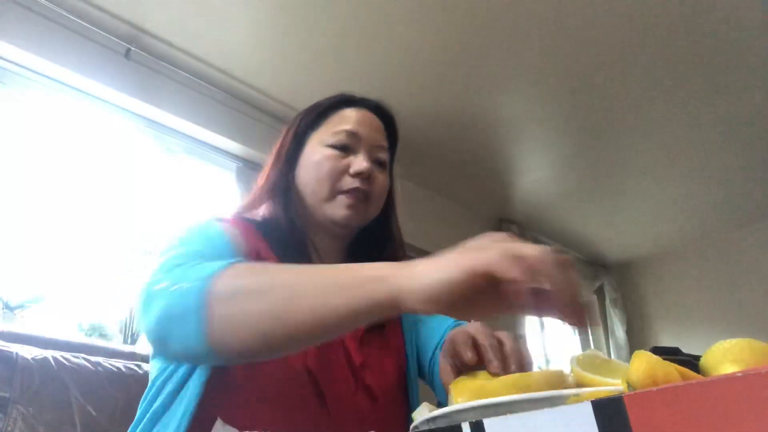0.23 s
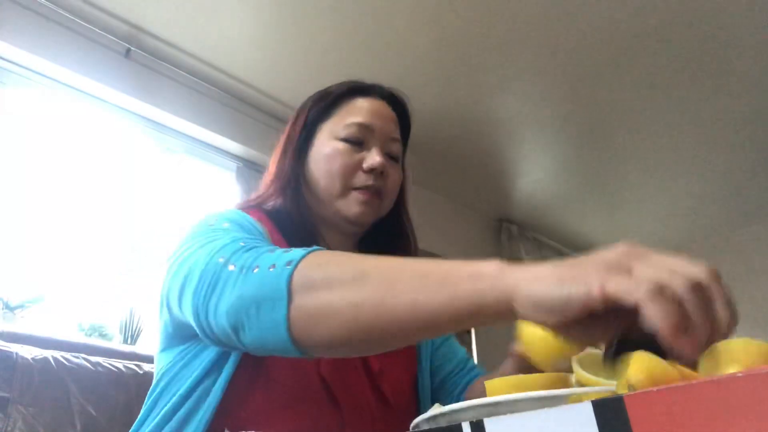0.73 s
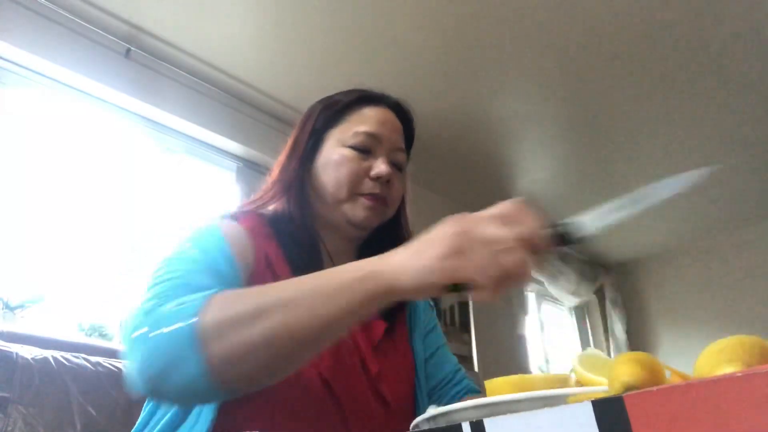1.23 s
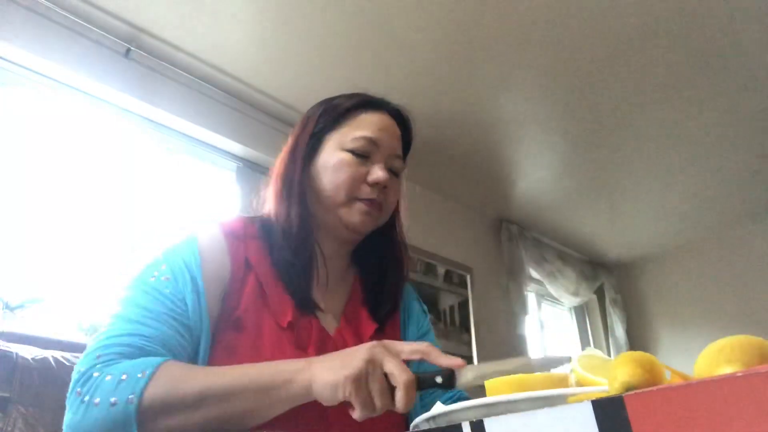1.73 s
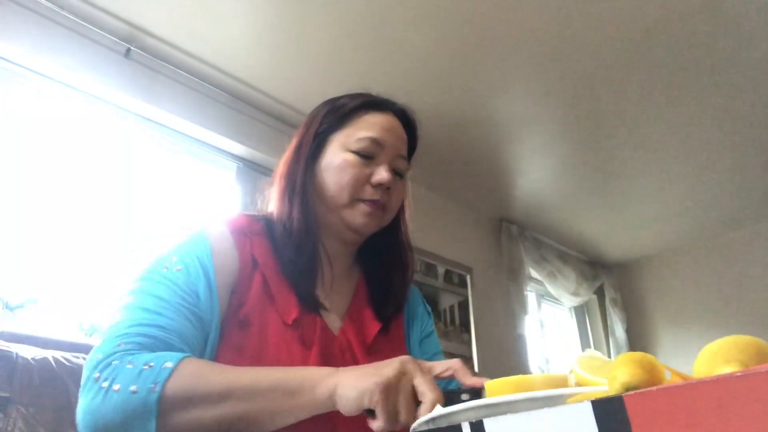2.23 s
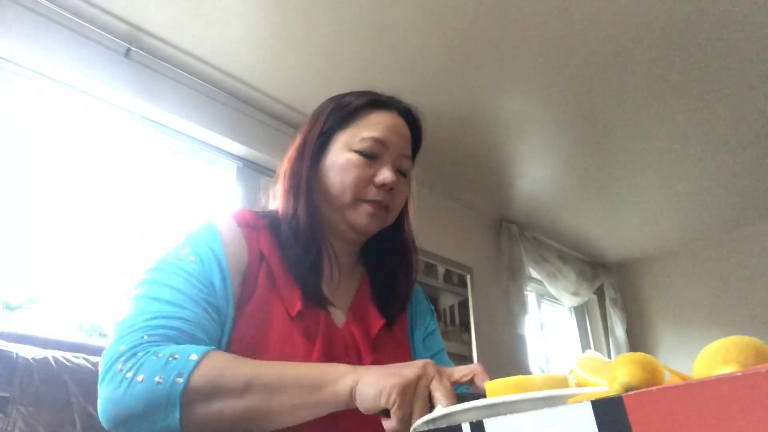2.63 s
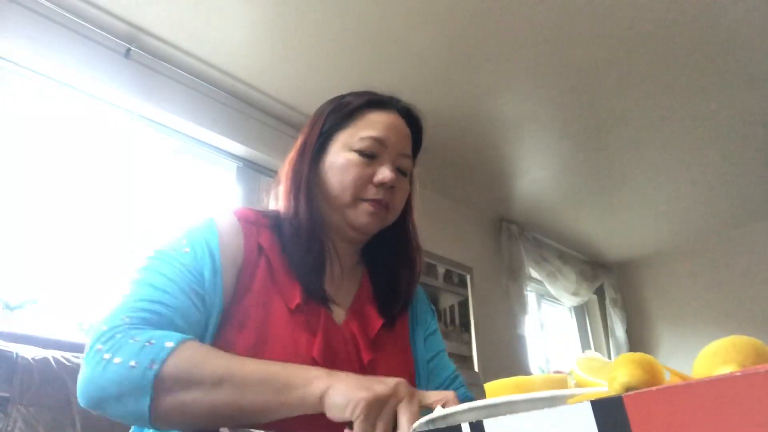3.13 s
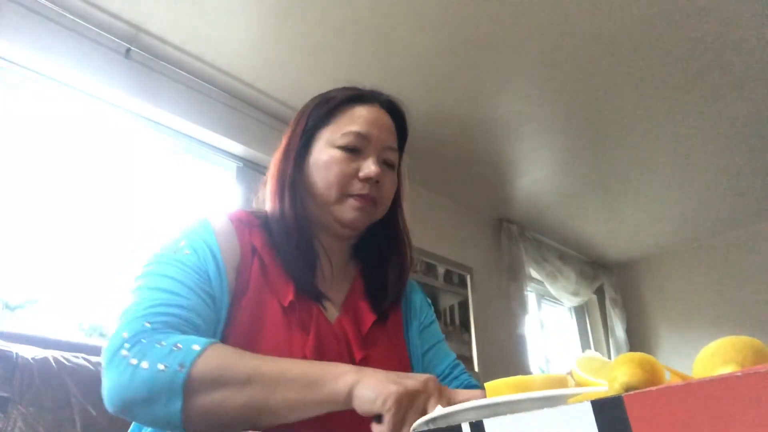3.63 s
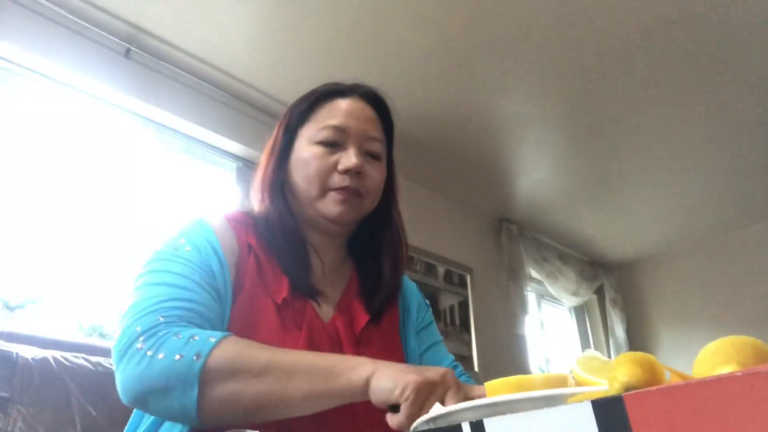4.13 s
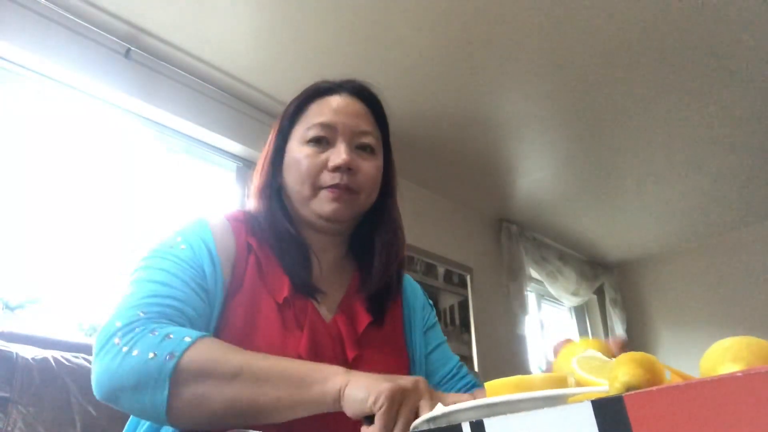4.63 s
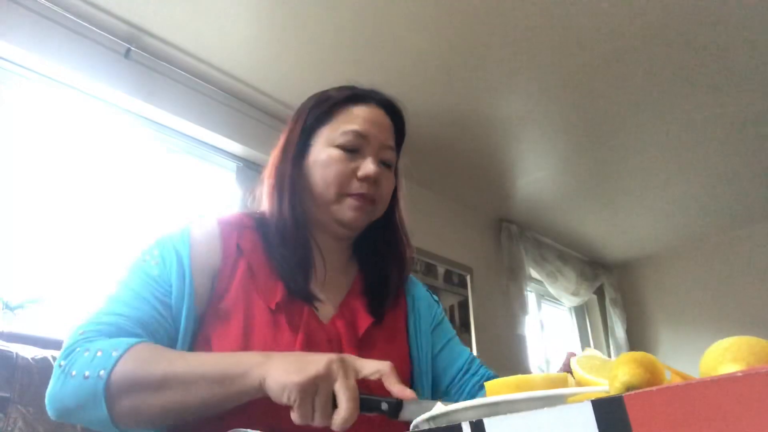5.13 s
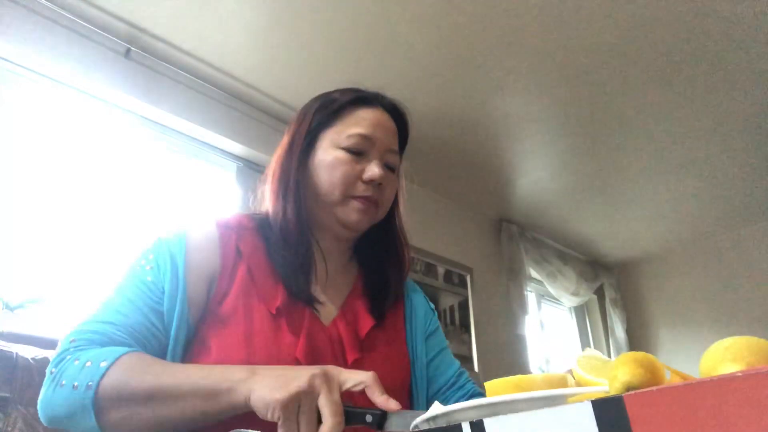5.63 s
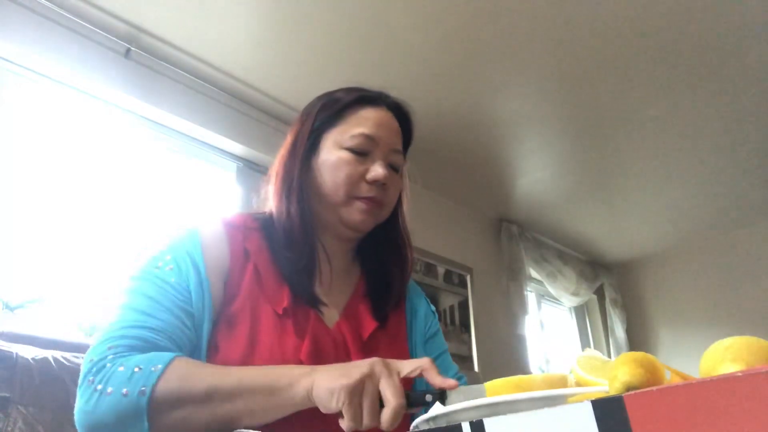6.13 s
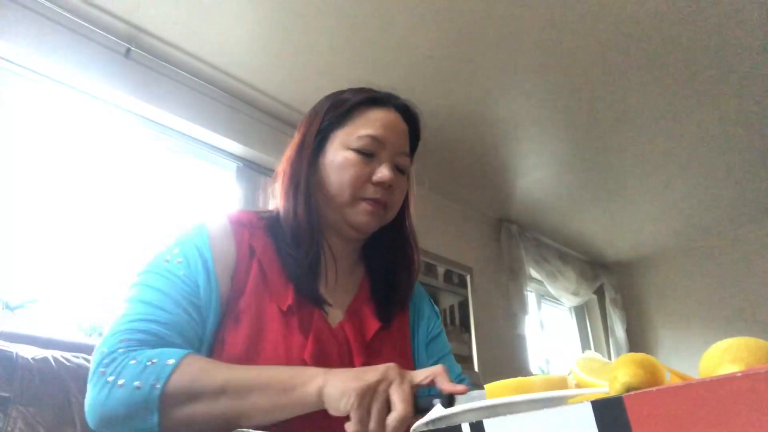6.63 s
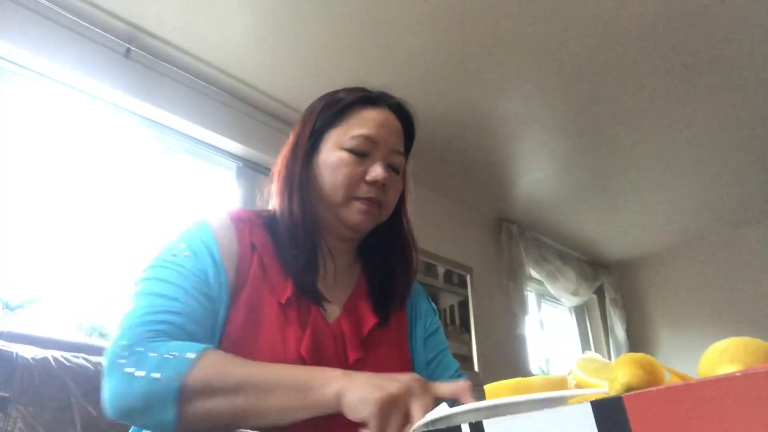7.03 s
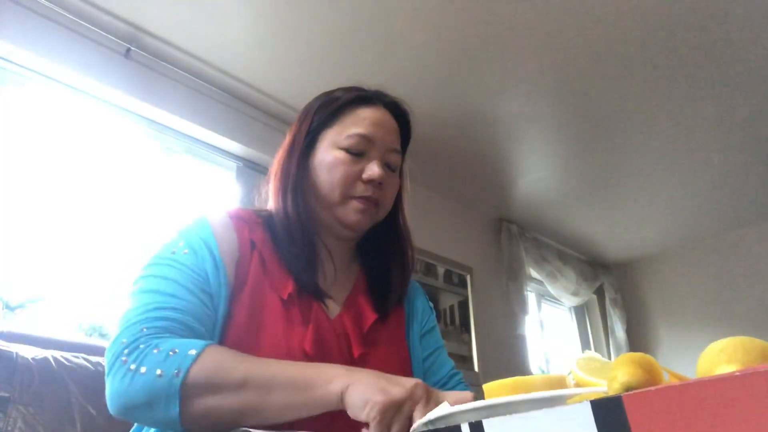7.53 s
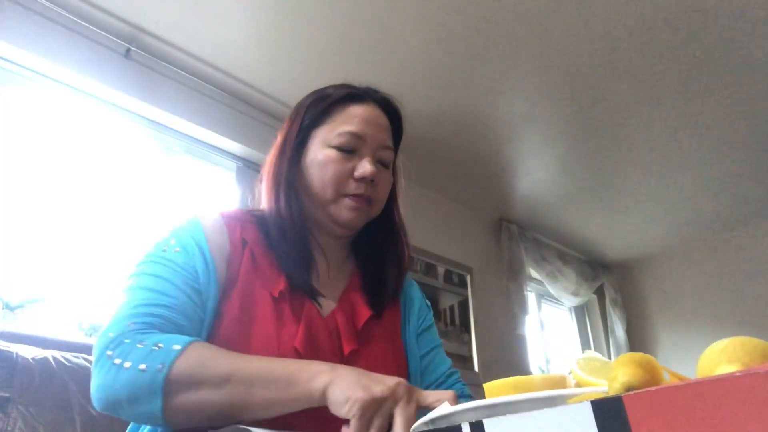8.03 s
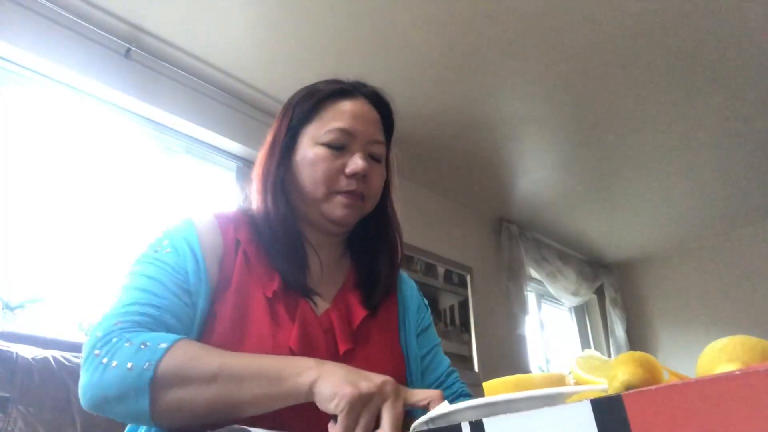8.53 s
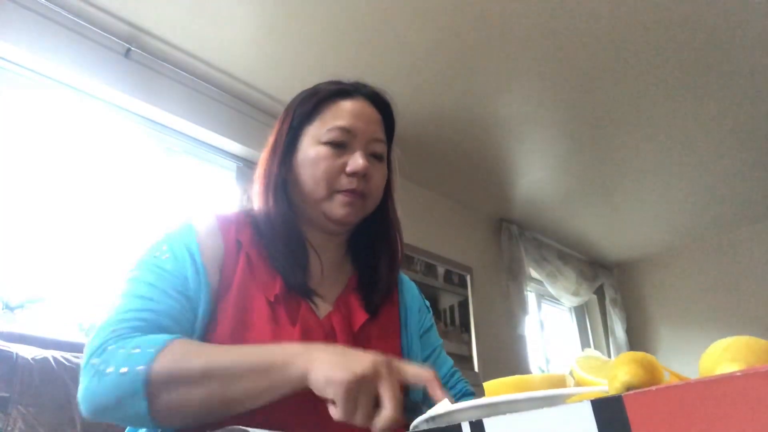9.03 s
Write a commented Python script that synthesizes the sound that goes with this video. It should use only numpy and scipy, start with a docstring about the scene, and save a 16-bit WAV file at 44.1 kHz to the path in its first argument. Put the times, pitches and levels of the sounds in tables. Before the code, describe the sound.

In a quiet living room, soft woody knocks and ticks, wet faint knife strokes, and sharp steel-on-china clinks thumping through the table.

```python
"""Lemons are sliced on a china plate at a table in a living room, the microphone standing on the same table.
Over quiet air (coloured noise), arms shift on the table (low noise, bumps) and the first strokes scrape faintly.
From 0.4 s a knife is picked up with dull knocks and ticks (pulses, noise bursts, modes), then saws (grains of noise).
From 4 s the blade clinks on the plate (ringing modes and a ping), thumping through the table top, loudest near 8.7 s.
A ceiling echo and a tail of decaying noise let the room ring on for up to half a second after a blow."""
import sys
import numpy as np
from scipy import signal
from scipy.fft import rfft, irfft
from scipy.io import wavfile
from scipy.ndimage import uniform_filter1d

SR = 44100
rng = np.random.default_rng(int(sys.argv[2]) if len(sys.argv) > 2 else 0)


def inscribe(sig):
    """Save sig as 16-bit PCM at rate SR to the path in sys.argv[1].

    A 1-D sig is mono; a 2-D sig holds one channel per row.
    Samples are clipped to [-1, 1] before scaling.
    """
    pcm = np.round(np.clip(np.atleast_2d(sig).T, -1, 1) * 32767)
    wavfile.write(sys.argv[1], SR, pcm.astype(np.int16))


N = 408807   # length of the scene, samples
HIT = np.arange(SR // 2) / SR   # time since a blow, s

# blade meets plate: (time [s], ring at 0.9-2.6 kHz [dB], ring at 2.6-5.5 kHz [dB], treble [dB],
# table thump [dB], share of the blade [0-1], first ping [Hz])
CLINKS = [(4.037, -54.5, -46, -52.5, -51, 0.92, 3180), (4.386, -56, -53, -54.5, -56, 0.4, 3160),
          (4.453, -46, -38.5, -43, -50.5, 0.8, 3180), (7.166, -34, -40, -40.5, -32.5, 0, 3470),
          (7.7322, -40.5, -49, -45.5, -46.5, 1, 3170), (8.09, -45.5, -47, -63, -40, 0.03, 3420),
          (8.19, -41.5, -43.5, -47, -45.5, 0, 3400), (8.5036, -42.5, -44.5, -48, -47, 0.01, 3360),
          (8.613, -34, -33.5, -41, -35.5, 0, 3520), (8.7454, -25, -26, -25.5, -28, 0.62, 3160)]
# dull knocks of fruit, knife handle and hands on the table: (time [s], rap [dB], boom [dB], rap centre [Hz])
KNOCKS = [(0.405, -35, -43.5, 600), (.522, -23.5, -29, 300), (0.555, -33, -30, 400), (.578, -37, -54, 377),
          (.638, -22, -26.5, 330), (.694, -25.5, -55, 400), (.725, -32, -39, 840), (0.736, -43, -54, 980),
          (0.758, -44, -63, 524), (0.821, -34, -62, 500), (0.901, -39.5, -67, 385),
          (1.035, -39.5, -40, 480), (1.212, -53.5, -50, 388), (1.264, -52.5, -57, 615),
          (1.415, -48.5, -47.5, 554), (1.524, -69, -53, 417), (1.845, -54, -47, 400),
          (1.951, -51, -60, 507), (2.145, -45.5, -47.5, 400), (2.395, -40, -57, 600),
          (2.584, -48.5, -65, 460), (2.799, -53, -44, 400), (2.875, -53, -42, 348),
          (3.826, -52.5, -72, 555), (4.016, -47, -59, 430), (4.041, -65, -45.5, 350),
          (4.554, -47, -56, 507), (4.924, -47, -47, 570), (5.112, -64, -54.5, 450), (5.238, -68, -66, 600),
          (5.82, -62, -64, 500), (6.133, -52.5, -67, 500), (6.479, -52, -54, 400), (6.549, -57, -68, 460),
          (7.167, -30, -36.5, 770), (7.766, -35, -58, 464), (7.817, -46, -64, 1020),
          (8.153, -46.5, -54, 1180), (8.48, -51, -56, 900), (9.136, -62, -51, 530),
          (9.225, -57, -49.5, 506)]


def from_db(db):
    """Decibels to gain."""
    return 10 ** (np.asarray(db) / 20)


def rms_one(x):
    """Scale to rms 1."""
    return x / np.sqrt(np.mean(x ** 2) + 1e-20)


def peak_one(x):
    """Scale so that the loudest five milliseconds have rms 1."""
    return x / np.sqrt(uniform_filter1d(x ** 2, size=220, mode="constant").max() + 1e-20)


def loudness_one(x):
    """Scale a blow so that its energy equals 15 ms at rms 1."""
    return x / np.sqrt(np.sum(x ** 2) / (.015 * SR) + 1e-20)


def at_hz(points, hz):
    """Read a table on a log-frequency axis."""
    table_hz, values = np.array(points).T
    return np.interp(np.log(hz + 1e-3), np.log(table_hz), values)


def cut(x, hz, kind, order=2):
    """Low-, high- or band-pass filter."""
    sos = signal.butter(order, np.clip(hz, 10, .45 * SR), kind, fs=SR, output="sos")
    return signal.sosfilt(sos, x + 1e-18)


def colour(x, spectrum):
    """Give a steady sound a spectrum; rms 1."""
    size = 2 ** 19
    gain = from_db(at_hz(spectrum, np.fft.rfftfreq(size, 1 / SR)))
    return rms_one(irfft(rfft(x, size) * gain)[:N])


def drift(rate_hz):
    """Slow chance with spread 1."""
    return rms_one(cut(rng.standard_normal(N + SR), rate_hz, "low")[SR:])


def add(out, s, sound):
    """Mix a sound in at a given time."""
    at = max(round(s * SR), 0)
    out[at:at + len(sound)] += sound[:N - at]


def swell(start, length, attack_s, release_s):
    """Pressure rises, holds until the length is over, then fades."""
    t = np.arange(N) / SR - start
    rise = np.clip(t / attack_s, 0, 1)
    fade = np.clip(1 - (t - length) / release_s, 0, 1) ** 2
    return rise * fade


def grains(per_s, spread_db):
    """Random small slips of uneven size."""
    out = np.zeros(N)
    at = np.flatnonzero(rng.random(N) < per_s / SR)
    size = np.minimum(rng.exponential(1, N)[at], 4)
    out[at] = from_db(spread_db * size) * np.sign(rng.random(N)[at] - .5)
    return out


def burst(t60):
    """The crunch of a contact: noise that dies at once."""
    return rng.standard_normal(len(HIT)) * from_db(-60 * HIT / t60)


def ring(modes, spread_db):
    """One blow: every mode dies away from a strength of its own."""
    out = np.zeros(len(HIT))
    for hz, db, t60 in modes:
        t = HIT[:int(1.2 * t60 * SR)]
        strength = from_db(db + spread_db * rng.standard_normal()) * np.sign(rng.random() - .5)
        decay = np.exp(-np.log(1000) * t / t60)
        out[:len(t)] += strength * decay * np.sin(2 * np.pi * hz * t)
    return out


def bend(x, corner_hz, order):
    """Bending waves carry the treble first, so a blow arrives as a short falling chirp: a chain of allpasses."""
    k = np.tan(np.pi * corner_hz / SR)
    pole = (k - 1) / (k + 1)
    return signal.sosfilt(np.tile([pole, 1, 0, 1, pole, 0], (order, 1)), x + 1e-18)


def thump(centre_hz, modes_db, crunch_db):
    """A push on the table: a broad pulse, a little crunch, then the ring of the top; unit peak level."""
    # modes of the table top: (frequency [Hz], relative level [dB], t60 [s])
    table_modes = [(171, -9, 0.15), (206.7, 4, 0.06), (300, -8, 0.45), (334, -4.5, 0.073), (400, 6, 0.049),
                   (480, 1.5, 0.022), (600, -6.5, 0.04), (668, 2, 0.031)]
    click = 1. * (HIT == 0)
    push = peak_one(cut(cut(click, centre_hz * 1.126, "high", order=3), centre_hz * 0.78, "low", order=3))
    crunch = peak_one(cut(cut(burst(0.043), centre_hz * 0.27, "high"), centre_hz * 3.05, "low", order=3))
    top = ring(table_modes, spread_db=3.0)
    top = peak_one(cut(cut(top, centre_hz * 1.19, "high"), centre_hz * 1.32, "low"))
    return peak_one(push + from_db(crunch_db) * crunch + from_db(modes_db) * top)


def room(x, wet_db, ceiling_db):
    """A ceiling echo, then a diffuse tail that dies soonest at the top of the treble."""
    # reverberation of the living room: (frequency [Hz], t60 [s])
    room_t60 = [(100, 0.77), (300, 0.56), (1000, 0.67), (2500, 0.56), (5000, 0.63), (9000, 0.4),
                (15000, 0.36)]
    t, edges = HIT, np.geomspace(40, 18000, num=10)
    tail = np.zeros(len(t))
    for low, high in zip(edges, edges[1:]):
        band = cut(rng.standard_normal(len(t)), [low, high], "band")
        tail += band * from_db(-60 * t / at_hz(room_t60, np.sqrt(low * high)))
    onset = np.clip((t - .005) / 0.00077, 0, 1)
    tail *= onset * (1 + from_db(5) * np.exp(-t / 0.01))   # denser at first
    tail *= from_db(wet_db) / np.sqrt(np.sum(tail ** 2))
    tail[round(.0098 * SR)] += from_db(ceiling_db)
    return x + signal.fftconvolve(x, tail)[:len(x)]


def shuffle():
    """Faint uneven bumps of arms on the table, and its low sway; both grow when an arm leans or a clink jolts it."""
    # an arm leans or shifts on the table: (start [s], length [s], bumps [dB], sway [dB])
    leans = [(0.283, 0.4, -58, -67), (1.016, 0.17, -63, -63), (1.4, 0.19, -68, -68),
             (2.777, 0.41, -72, -67), (4.41, 0.21, -61.5, -64.5), (4.906, 0.09, -78.5, -65),
             (6.281, 0.59, -65, -76), (7.248, 0.21, -68, -63.5), (9.05, 0.36, -62, -64.5)]
    # low sway of the table: (frequency [Hz], relative level per Hz [dB])
    sway_spectrum = [(20, -22.5), (36, -12), (47, -4.5), (58, -11.5), (78, -4), (100, -12), (160, -40.5),
                     (300, -49.5)]
    lean_attack_s, lean_release_s = 0.013, 0.18
    rest_bumps_db, rest_sway_db = -71, -75.5   # arms resting on the table never keep quite still
    jolt_bumps_db, jolt_sway_db, jolt_t60_s = -25.5, -21.5, 0.87   # levels relative to the clink's thump
    t = np.arange(N) / SR
    stir = np.outer(from_db([rest_bumps_db, rest_sway_db]), np.ones(N))   # rows: bumps, sway
    for s, length, *levels_db in leans:
        lean = swell(s, length, lean_attack_s, lean_release_s)
        stir = np.maximum(stir, np.outer(from_db(levels_db), lean))
    for s, _, _, _, thump_db, *_ in CLINKS:
        jolt = (t > s) * from_db(thump_db - 60 * np.abs(t - s) / jolt_t60_s)
        stir = np.maximum(stir, np.outer(from_db([jolt_bumps_db, jolt_sway_db]), jolt))
    bumps = rms_one(cut(cut(grains(per_s=300, spread_db=-1.5), 130, "high"), 610, "low"))
    bumps = bumps * from_db(0.8 * drift(9))
    sway = colour(rng.standard_normal(N), sway_spectrum)
    return np.sum(stir * [bumps, sway], axis=0)


def sawing():
    """The edge tears cells of rind in clumps and drags over the china; coarser slips shake the table."""
    # strokes of knife and fruit:
    # (start [s], length [s], table judder [dB], scrape on china [dB], tearing rasp [dB])
    strokes = [(.05, 0.092, -73, -73.5, -76.5), (0.133, 0.39, -66.5, -71.5, -69.5),
               (0.647, 0.111, -38.5, -52, -84), (0.822, 0.089, -59, -66, -64.5),
               (1.026, 0.28, -66, -74, -78.5), (2.195, 0.21, -66, -70, -71),
               (2.455, 0.14, -63.5, -68.5, -66.5), (2.61, 0.11, -52.5, -64.5, -59),
               (2.773, 0.112, -50.5, -56.5, -57.5), (2.934, 0.091, -54, -57.5, -61),
               (3.04, 0.067, -62, -69, -67), (3.356, 0.14, -62.5, -62, -71), (3.544, 0.14, -70, -68, -72),
               (4.152, .1, -64.5, -61.5, -63), (4.282, 0.24, -62, -65, -64.5), (5.688, 0.19, -77, -81, -84),
               (5.906, 0.043, -73, -67, -67), (6.145, .21, -67.5, -72, -74), (6.567, 0.16, -72.5, -72, -70),
               (6.78, 0.1, -50.5, -59, -58.5), (6.935, 0.09, -46.5, -56, -55),
               (7.083, 0.12, -53.5, -56.5, -56.5), (7.257, 0.087, -61, -50.5, -60),
               (7.48, 0.13, -66, -65, -69), (7.673, 0.055, -64, -59, -63.5),
               (8.397, 0.098, -63, -65.5, -65.5)]
    # spectra of table judder, scrape on china and tearing rind: (frequency [Hz], relative level per Hz [dB])
    judder_spectrum = [(40, -52), (65, 0.5), (110, -18), (160, 6.5), (195, 4.5), (245, -3), (310, 4.5),
                       (420, -4), (600, -1.5), (800, -12.5), (1200, -23), (2000, -57)]
    scrape_spectrum = [(500, -32), (900, -3.5), (1270, 9.5), (1550, -5.5), (2100, 4.5), (2750, -7.5),
                       (3250, -4), (3700, -15), (5000, -39.5)]
    rasp_spectrum = [(1200, -4.5), (2400, -2.5), (3200, 0.5), (3900, -1.5), (4900, -1.5), (6400, -9.5),
                     (7700, -11.5), (8500, -18), (15000, -20.5)]
    attack_s, release_s = 0.041, 0.017   # the edge bites, holds its pressure and lets go
    effort = np.zeros((3, N))   # rows: judder, scrape, tearing
    for s, length, *levels_db in strokes:
        effort += np.outer(from_db(levels_db), swell(s, length, attack_s, release_s))
    judder = colour(grains(per_s=770, spread_db=2.0), judder_spectrum)
    scrape = colour(grains(per_s=400, spread_db=2.5), scrape_spectrum)
    tearing = colour(grains(per_s=1000, spread_db=3.), rasp_spectrum)
    clumps = from_db(2 * drift(48))
    return np.sum(effort * [judder, scrape, tearing], axis=0) * clumps


def ticks():
    """Tiny hard contacts too light to set the plate ringing: a short band of noise and a faint crack."""
    # small sharp ticks of the knife and of snapping rind: (time [s], level [dB], centre [Hz])
    tick_events = [(.3983, -56.5, 2570), (.449, -55, 2500), (.5232, -38, 2180), (.6388, -40, 2250),
                   (.8802, -54, 2480), (.9192, -45.5, 2116), (2.799, -59, 2120), (3.3877, -66, 2030),
                   (3.473, -56.5, 1880), (3.663, -71, 2120), (4.437, -48.5, 3270), (7.7416, -41.5, 4400),
                   (8.4294, -57.5, 6700)]
    out = np.zeros(N)
    for s, db, hz in tick_events:
        tick = peak_one(cut(burst(.03), [hz * .85, hz * 1.4], "band"))
        crack = peak_one(cut(burst(0.02), hz, "high"))
        add(out, s, from_db(db) * (tick + from_db(-13.5) * crack))
    return out


def knocks():
    """Soft things set down on the table: a woody rap over a low boom."""
    out = np.zeros(N)
    for s, rap_db, boom_db, hz in KNOCKS:
        rap = from_db(rap_db) * thump(hz, modes_db=-6, crunch_db=-11.5)
        boom = from_db(boom_db) * thump(centre_hz=212, modes_db=-13.0, crunch_db=-12.0)
        add(out, s, rap + boom)
    return bend(out, corner_hz=680.0, order=11)


def rattle():
    """Each knock sets the knife and loose fruit chattering in small uneven contacts."""
    # colour of the chatter: (frequency [Hz], relative level per Hz [dB])
    rattle_spectrum = [(500, -12), (1200, 14), (1900, -6.5), (2600, -10), (3500, -12), (4400, 1),
                       (6000, -15.5), (9500, -14.5), (15000, -28)]
    rattle_db, rattle_t60_s = -26.5, 0.26   # level relative to the knock's rap
    shaken = np.zeros(N)
    for s, rap_db, *_ in KNOCKS:
        add(shaken, s, from_db(rap_db + rattle_db - 60 * HIT / rattle_t60_s))
    contacts = grains(per_s=150, spread_db=3.5)
    return shaken * colour(contacts, rattle_spectrum)


def clinks():
    """Steel on china: both ring, and the place and hardness of the touch set the colour."""
    # modes of the plate, then of the knife blade: (frequency [Hz], relative level [dB], t60 [s])
    plate_modes = [(1223, 1.5, .15), (1328, 4.5, .13), (2062, 2, 0.11), (2160, 8.5, 0.12), (2256, 2.5, .1),
                   (2622, -5, 0.076), (2830, 4, .08), (3500, 17.5, 0.077), (3790, 8, 0.14), (4540, 8, 0.11),
                   (4960, 4, 0.021), (5520, 4, 0.017), (6594, 4.5, .13), (7720, -3, .11), (9200, -10.5, .2),
                   (10600, -10, .07), (12300, -10.5, .08)]
    blade_modes = [(1275, 3, 0.087), (2013, 10, .075), (3210, 11.5, .06), (3363, 6.5, 0.067),
                   (3690, 0, .07), (4300, 5, 0.064), (5760, -3.5, .08), (6280, -2.5, .1), (6630, -0.5, .07),
                   (7440, -1.5, .07), (7860, 3, .09), (9200, -9.5, 0.084), (9700, -4.5, .06),
                   (11050, -6.5, .06)]
    ping_t60_s, ping_over_ring_db = 0.0093, 6
    out = np.zeros(N)
    for s, ring_db, upper_db, treble_db, thump_db, share, ping_hz in CLINKS:
        share = np.clip(share, .03, 1)   # a little of the blade is always heard
        plate, blade = ring(plate_modes, spread_db=2.), ring(blade_modes, spread_db=2.)
        blade += from_db(6) * burst(0.0092)   # the thin edge also crackles
        rings = np.sqrt(1 - share) * plate + np.sqrt(share) * blade
        rings *= 1 + from_db(18) * from_db(-60 * HIT / 0.021)   # the hand soon damps the first swing
        hit = room(rings, wet_db=-1.0, ceiling_db=-20.0)
        clink = from_db(ring_db) * loudness_one(cut(hit, [900, 2600], "band", order=4))
        clink += from_db(upper_db) * loudness_one(cut(hit, [2600, 5500], "band", order=4))
        clink += from_db(treble_db) * loudness_one(cut(hit, 5500, "high", order=4))
        # a short first ping reaches the microphone through the table, untouched by the room
        ping = HIT * from_db(-60 * HIT / ping_t60_s) * np.sin(2 * np.pi * ping_hz * HIT)
        ping = from_db(upper_db + ping_over_ring_db) * peak_one(ping)
        add(out, s, ping + bend(clink, corner_hz=2500, order=36))
    return out


def plate_thumps():
    """Each clink also presses the plate into the table top."""
    out = np.zeros(N)
    for s, _, _, _, thump_db, *_ in CLINKS:
        rap = thump(centre_hz=694, modes_db=-10, crunch_db=-3.5)
        boom = from_db(-2) * thump(centre_hz=243, modes_db=-4.5, crunch_db=-3)
        add(out, s, from_db(thump_db) * bend(rap + boom, corner_hz=2500, order=36))
    return out


def scene():
    """Knife, plate and table in the room, over quiet air."""
    # quiet room: (frequency [Hz], relative level per Hz [dB])
    air_spectrum = [(20, -26), (45, -26), (100, -14.5), (190, -6), (260, -12.5), (335, -8), (430, -18.5),
                    (750, -14.5), (1300, -19.5), (1600, -25.5), (3500, -28.5), (5500, -31), (16000, -44.5)]
    air_db = -66.5
    through_air = clinks() + room(sawing() + plate_thumps(), wet_db=-3.5, ceiling_db=-13.5)
    through_table = room(knocks() + ticks() + rattle(), wet_db=-6.0, ceiling_db=-18) + shuffle()
    air = from_db(air_db) * colour(rng.standard_normal(N), air_spectrum)
    return (through_air + through_table + air)[None]


def record(dry):
    """The top of the treble is cut steeply."""
    cutoff_hz = 15900
    return signal.sosfilt(signal.ellip(10, .1, 80, cutoff_hz, fs=SR, output="sos"), dry)


dry = scene()
out = record(dry)
inscribe(out)
```